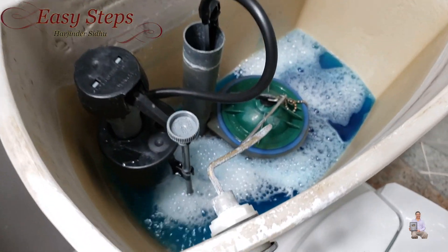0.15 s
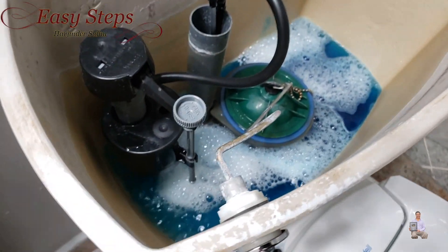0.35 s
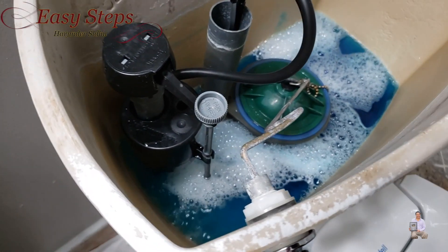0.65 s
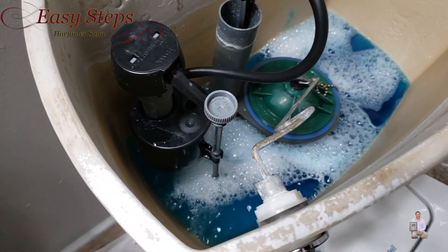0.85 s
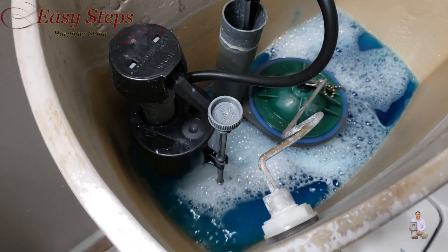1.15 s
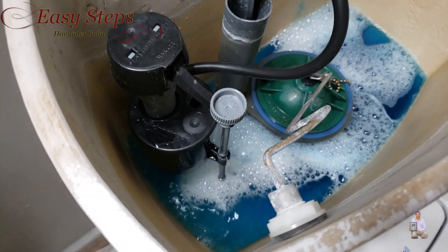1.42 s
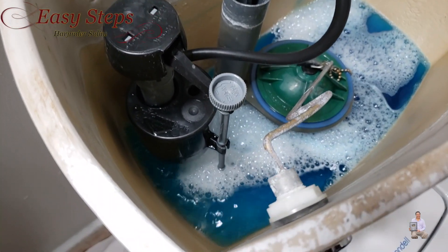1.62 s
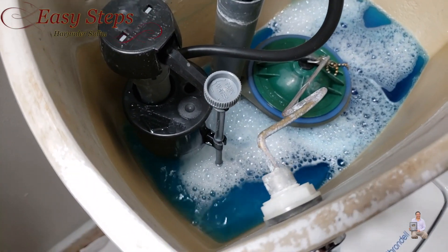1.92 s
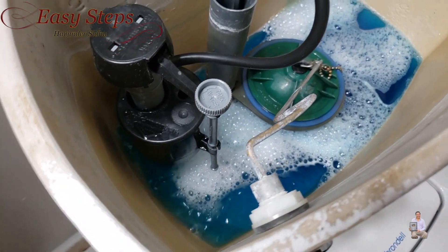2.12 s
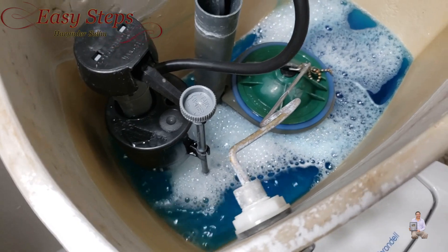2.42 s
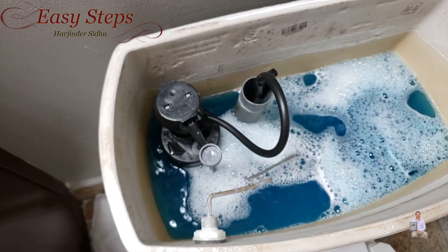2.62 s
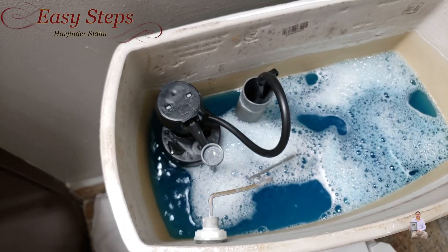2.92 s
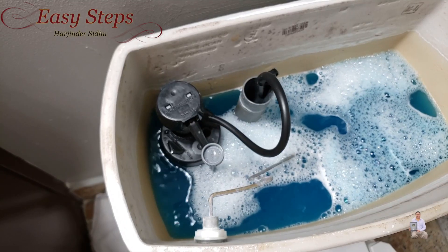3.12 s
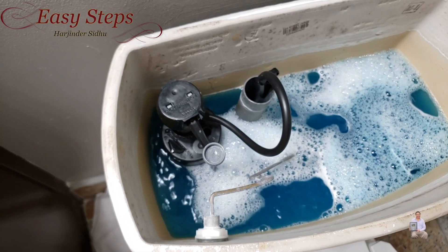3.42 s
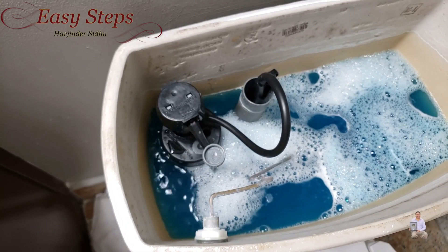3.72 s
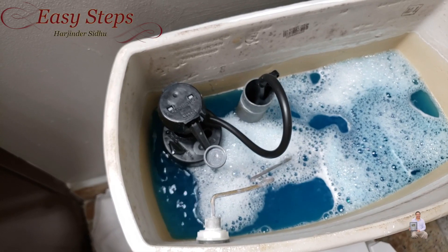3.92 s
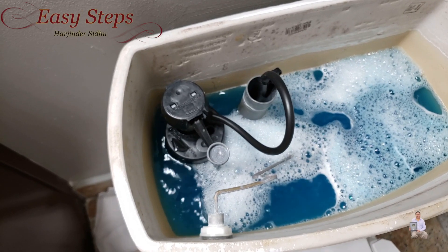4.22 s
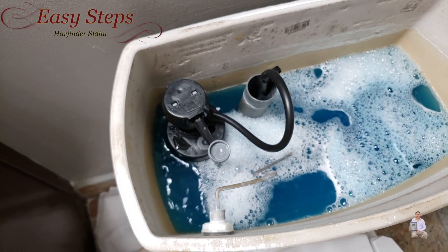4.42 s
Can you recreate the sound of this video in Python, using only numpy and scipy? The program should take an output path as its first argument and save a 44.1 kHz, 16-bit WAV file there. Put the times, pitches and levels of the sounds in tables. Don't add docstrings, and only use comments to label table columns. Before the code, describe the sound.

A toilet tank fill valve hisses steadily with bright rushing water, shifting abruptly to a slightly darker, softer hiss partway through.

```python
import sys
import numpy as np
from scipy import signal
from scipy.io import wavfile

SR = 44100
rng = np.random.default_rng(int(sys.argv[2]) if len(sys.argv) > 2 else 0)


def ratio(d):
    e = np.asarray(d, float) / 20
    return 10 ** e


def wav_record(signal):
    frames = np.transpose(np.atleast_2d(signal))
    bounded = np.clip(frames, -1, 1)
    quanta = np.round(bounded * 32767).astype(np.int16)
    wavfile.write(sys.argv[1], SR, quanta)


N = 201028
JUMP = round(2.659 * SR)
STEP = 40

# resonance in Hz, width in Hz,
# left level in dB per Hz, right level in dB per Hz, likeness of the ports 0-1, right lead in radians.
TANK_LOW = [(110, 68, -86, -88, 1, -2), (209.5, 61, -78.5, -80, 1, 0), (268.3, 36, -75.5, -79.5, 0.88, -1),
            (379, 106, -86.5, -87, 0.53, -4), (565, 174, -78.5, -81, 0.73, 1.1),
            (820, 200, -89, -86, 1, 0.3), (998, 99, -70.5, -70.5, 0.7, -0.92),
            (1154, 130, -82, -79.5, 0.57, -2), (1394, 176, -73, -71.5, 0.8, -2.5),
            (1660, 210, -72.5, -71, 0, 3), (2080, 343, -64.5, -69, 0.69, -2.5),
            (2770, 480, -81.5, -74.5, 0.15, -2), (3163, 550, -73, -72.5, 0.2, 4),
            (3700, 420, -74, -78, 0.75, -2.5)]
# resonance in Hz, width in Hz, left level in dB per Hz,
# right level in dB per Hz, likeness of the ports 0-1, right lead in radians.
VALVE_LOW = [ (4410, 690, -75, -73, 0.27, 2.5), (4786, 840, -66.5, -70.5, 0.65, 1.4),
             (5067, 256, -61, -56, 0.66, 0.97), (5480, 620, -68.5, -67.5, 0.56, 1.5),
             (6540, 290, -81, -85, 0.9, 4), (6670, 830, -62, -69, 0.28, 0.2),
             (8300, 1200, -75.5, -73, 0.24, 3)]
# resonance in Hz, width in Hz, left level in dB per Hz,
# right level in dB per Hz, likeness of the ports 0-1, right lead in radians.
SPRAY_LOW = [(8620, 230, -82, -71, 0, 1.5), (9400, 1370, -85.5, -74, 0.01, -0.5),
             (10330, 940, -73.5, -77.5, 0, -0.5), (11780, 1570, -72, -68, 0.1, 1),
             (12930, 540, -69.5, -63.5, 0.66, -0.8), (13080, 1500, -80, -66.5, 0.52, -1.5),
             (13750, 1670, -68, -73, 0.03, 4.5), (14900, 420, -77, -63, 0.41, -7.5),
             (14740, 3400, -70, -73.5, 0.15, -3)]
# time in seconds, nearness in dB, turn as extra right lead in microseconds.
SWAY_LOW = [
    (0.0, -0.1, -22),
    (0.4, 0.6, -27),
    (0.7, 0.4, 15),
    (1.3, 1.0, 17),
    (2.0, 1.0, -1),
    (2.65, 1.2, -2),
]


def low_water():
    modes = TANK_LOW + VALVE_LOW + SPRAY_LOW
    return jet(modes, SWAY_LOW, 0, JUMP, flutter_db=0.5, patchy_db=0.18, wander_rad=0.82, closer=0.88)


# resonance in Hz, width in Hz,
# left level in dB per Hz, right level in dB per Hz, likeness of the ports 0-1, right lead in radians.
TANK_HIGH = [(112, 43, -80, -80.5, 1, -2), (213.5, 93, -76.5, -78.5, 0.91, 2),
             (308, 118, -79.5, -83, 0.99, 2.5), (452, 106, -85.5, -83.5, 0.7, -0.2),
             (664, 250, -78, -81.5, 0.56, 0.2), (1058, 230, -83, -80, 0.36, -1.2),
             (1240, 68, -73.5, -78.5, 0.6, -0.2), (1363, 140, -78, -77.5, 0.4, -0.9),
             (1726, 130, -70.5, -67.5, 0, -2.5), (2050, 246, -65, -67, 0.53, -1.7),
             (2370, 500, -76, -80.5, 0.3, 1), (2824, 400, -76, -69, 0.42, -0.2),
             (3440, 390, -68.5, -69.5, 0.86, -2.5), (3680, 290, -71, -71, 0.75, -2.5)]
# resonance in Hz, width in Hz, left level in dB per Hz,
# right level in dB per Hz, likeness of the ports 0-1, right lead in radians.
VALVE_HIGH = [ (4354, 280, -71, -72, 0.1, 4), (4970, 960, -65.5, -63, 0.49, 2),
              (5020, 183, -60.5, -55.5, 0.051, 4.5), (5570, 70, -78, -84, 0.81, -8),
              (6380, 290, -83, -71, 0, 2), (6555, 570, -64, -77, 0.7, 3.5),
              (6855, 960, -64.5, -71.5, 0.35, 2.5), (7980, 410, -83, -71, 0, -4)]
# resonance in Hz, width in Hz, left level in dB per Hz,
# right level in dB per Hz, likeness of the ports 0-1, right lead in radians.
SPRAY_HIGH = [ (8730, 1400, -80, -74, 0.13, 3), (9680, 1200, -77.5, -74, 0, 3),
              (10200, 600, -82, -71.5, 0, -0.5), (11400, 2100, -77, -76.5, 0.09, -1),
              (12300, 990, -77, -63, 0.4, -3), (13470, 2800, -71.5, -69, 0.03, 2),
              (14400, 670, -72, -88, 0.51, -8.5), (15300, 1000, -75, -80, 0.2, 6)]
# time in seconds, nearness in dB, turn as extra right lead in microseconds.
SWAY_HIGH = [
    (2.64, -0.8, -14),
    (3.2, 0.39, -5),
    (3.6, 0.57, -5),
    (3.95, 0.094, 0),
    (4.25, -0.17, 1),
    (4.56, 2.4, 4),
]


def high_water():
    modes = TANK_HIGH + VALVE_HIGH + SPRAY_HIGH
    return jet(modes, SWAY_HIGH, JUMP, N - JUMP, flutter_db=-0.5, patchy_db=0.4, wander_rad=0.75, closer=1.0)


def jet(modes, sway, start, size, flutter_db, patchy_db, wander_rad, closer):
    sway_s, near_column, lead_column = np.transpose(sway)
    surge = drift(8.7, size)
    now_s = (start + STEP * np.arange(len(surge))) / SR
    near_db = np.interp(now_s, sway_s, near_column)
    lead_us = np.interp(now_s, sway_s, lead_column)
    pan_db = 0.14 - 0.0219 * lead_us
    white = turbulence(count=8, size=size).reshape(4, 2, size)
    out = np.zeros((2, size))
    for k, (hz, width_hz, left_db, right_db, alike, lead) in enumerate(modes):
        shared, own = ring(white[k % 4], hz, width_hz)
        bright = np.clip(hz / 5000, 0, 1)
        loose = bright * (1 - alike)
        pull = closer * np.sqrt(abs(alike)) * np.clip(0.51 + hz / 9000, 0, 1.8)
        alike = np.clip(alike + pull * (1 - alike), 0, 1)

        lead = lead * min(1, hz / 900) ** 2
        turning = 2 * np.pi * hz * lead_us / 10 ** 6
        wander = wander_rad * loose * drift(0.35, size)
        phase = np.exp(1j * (lead + turning + wander))

        follows = 0.1 if hz < 3900 else 0.99 if hz < 8500 else 0.53
        flicker_db = flutter_db * surge + patchy_db * drift(2.6, size)
        level_db = follows * near_db + bright * flicker_db
        tip_db = bright * pan_db / 2
        right = smooth(alike * phase, size) * shared + np.sqrt(1 - alike ** 2) * own
        out[0] += smooth(ratio(left_db + level_db + tip_db), size) * shared.real
        out[1] += smooth(ratio(right_db + level_db - tip_db), size) * right.real
    return out


def turbulence(count, size):
    return rng.standard_normal((count, size)) + 1j * rng.standard_normal((count, size))


def ring(white, hz, width_hz):
    pole = np.exp((2j * hz - width_hz) * np.pi / SR)
    gain = (1 - abs(pole)) ** 2 * np.sqrt(SR)
    return signal.lfilter([gain], [1, -2 * pole, pole ** 2], white)


def drift(rate_hz, size):
    r = np.exp(-2 * np.pi * STEP * rate_hz / SR)
    white = rng.standard_normal(size // STEP + 3002)
    slow = signal.lfilter([1], [1, -2 * r, r * r], white)[3000:]
    return slow / np.std(slow)


def smooth(slow, size):
    return np.interp(np.arange(size) / STEP, np.arange(len(slow)), slow)


# delay in seconds, level in dB.
ECHOES = [
    (.0023, -18),
    (.0034, -13),
    (.0051, -13),
    (.0078, -11.5),
    (.0117, -14),
]


def walls(x):
    at = np.arange(N)
    high = signal.sosfilt(signal.butter(2, 2560, "high", fs=SR, output="sos"), x)
    echoes = np.zeros_like(x)
    for lag_s, echo_db in ECHOES:
        lag = SR * (lag_s + 0.00004 * smooth(drift(0.3, N), N))
        for port in range(2):
            port_lag = lag + SR * 0.000006 * smooth(drift(0.3, N), N)
            heard = at - np.round(port_lag).astype(int)
            echoes[port] += ratio(echo_db) * high[port][np.clip(heard, 0, N - 1)]
    return (x + echoes) * ratio(-0.55)


# frequency in Hz, level in dB.
HUM = [
    (100, -71.5),
    (119, -67.5),
]


def hum():
    out = 0
    for hz, level_db in HUM:
        tone = ring(turbulence(count=1, size=N)[0], hz, 9.0).real
        out = out + ratio(level_db) * tone / np.std(tone)
    return out * ratio(np.array([[0.7], [-0.7]]))


def scene():
    water = np.concatenate([low_water(), high_water()], axis=1)
    return walls(water) + hum()


def top_cut(x):
    return signal.sosfilt(signal.butter(12, 16030, fs=SR, output="sos"), x)


def record(dry):
    x = signal.sosfilt(signal.butter(2, 47, "high", fs=SR, output="sos"), dry)
    x = signal.sosfilt(signal.ellip(14, 0.3, 90, 15710, fs=SR, output="sos"), x)
    return top_cut(x)


dry = scene()
out = record(dry)
wav_record(out)
```